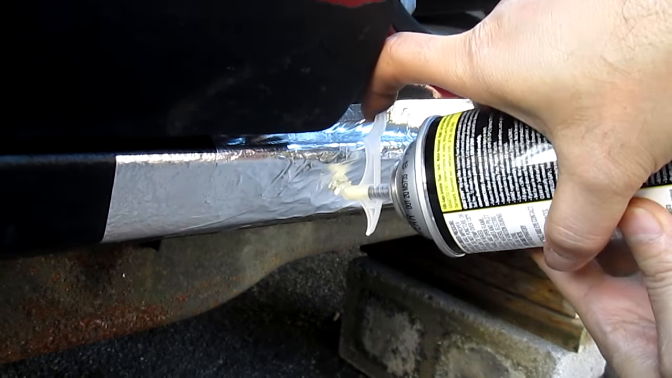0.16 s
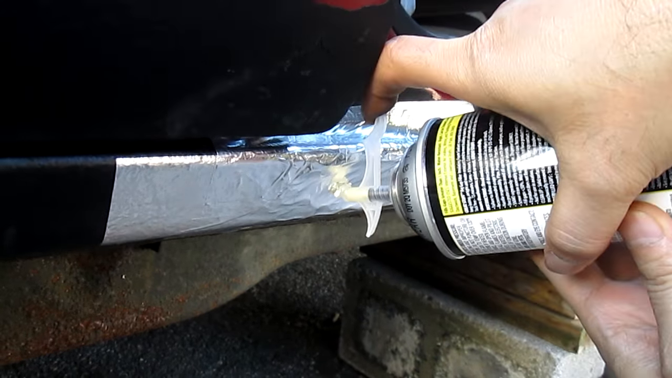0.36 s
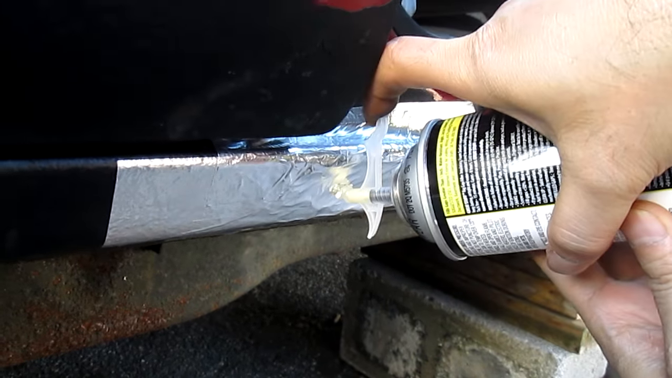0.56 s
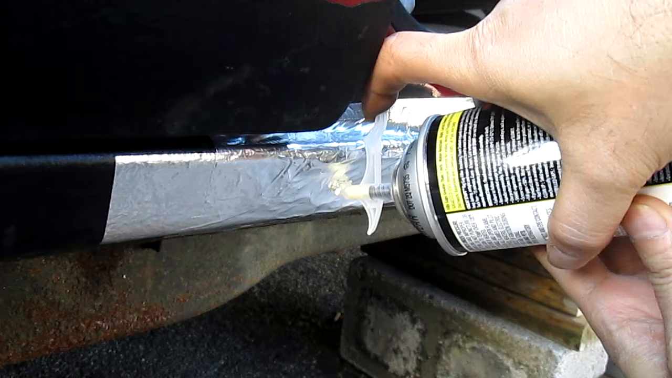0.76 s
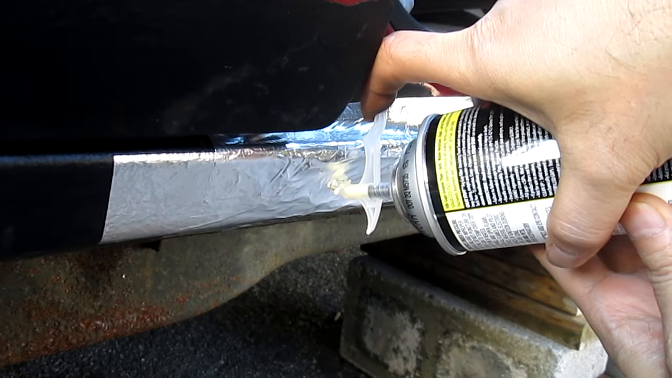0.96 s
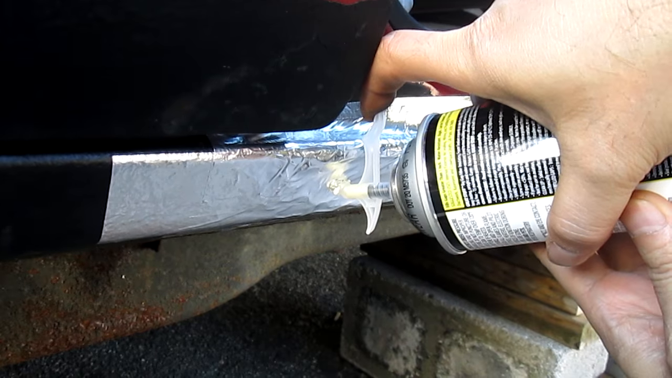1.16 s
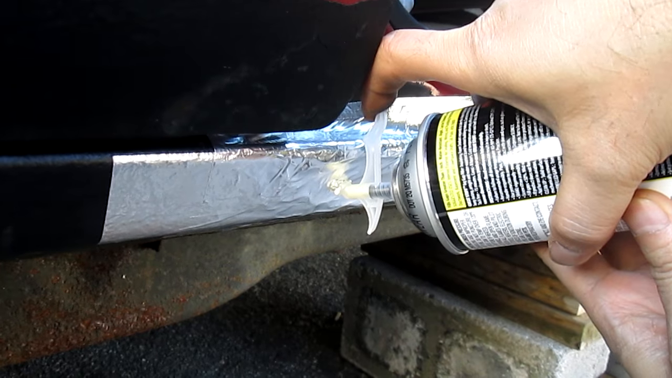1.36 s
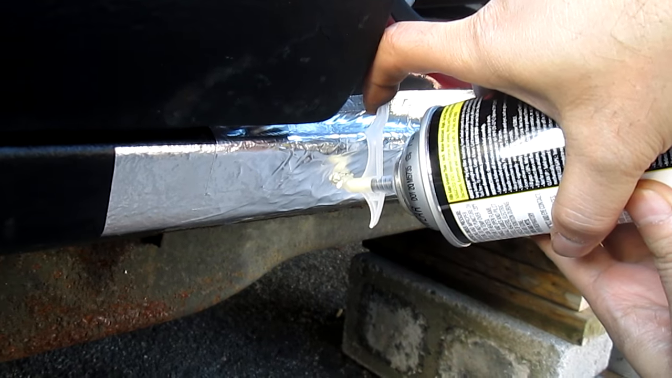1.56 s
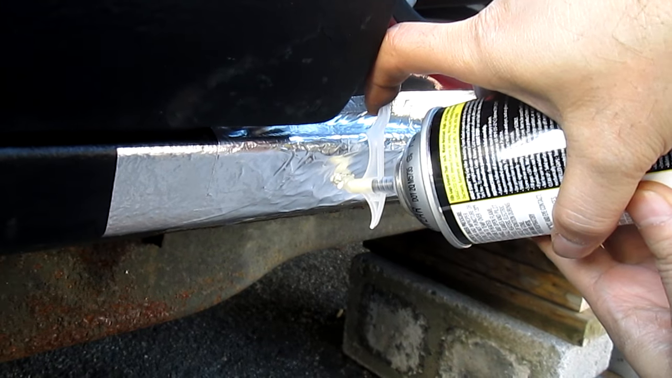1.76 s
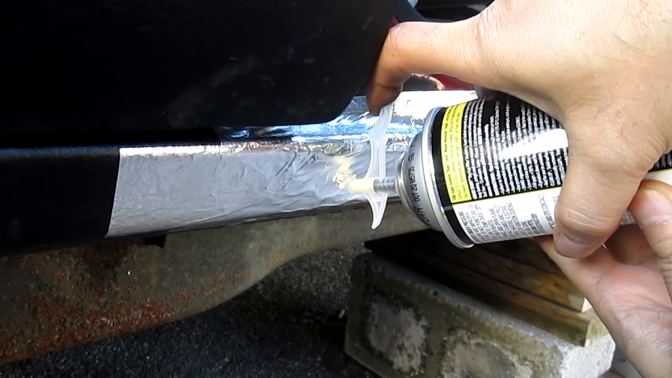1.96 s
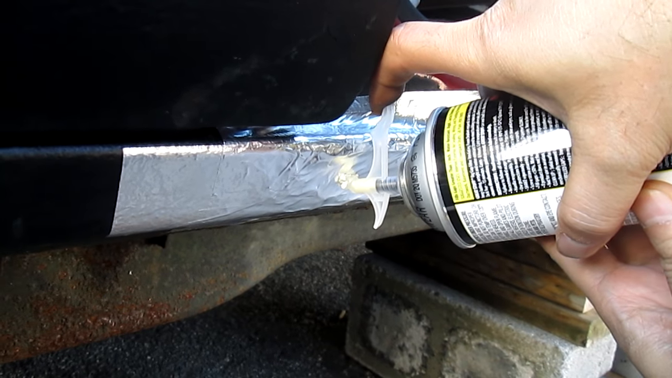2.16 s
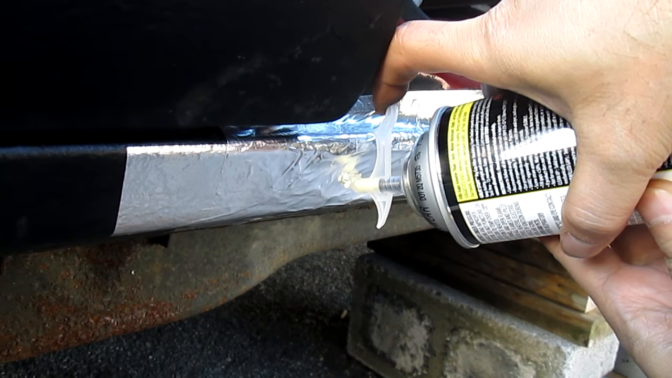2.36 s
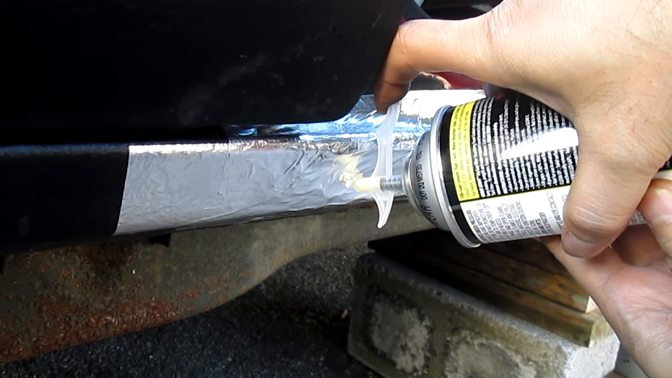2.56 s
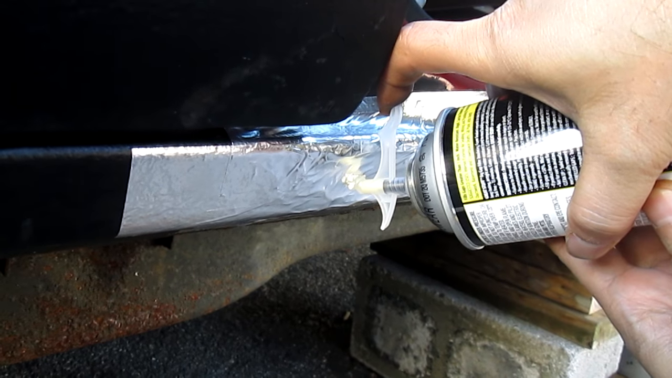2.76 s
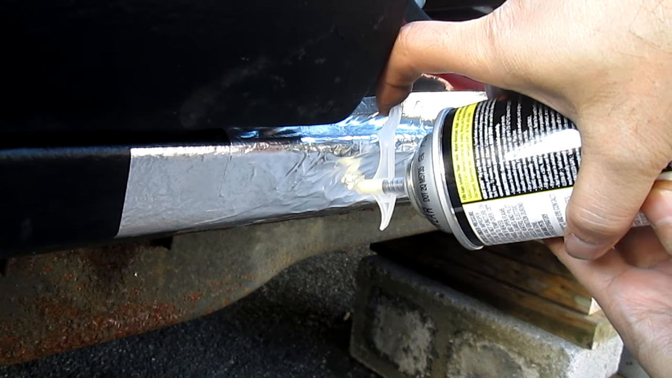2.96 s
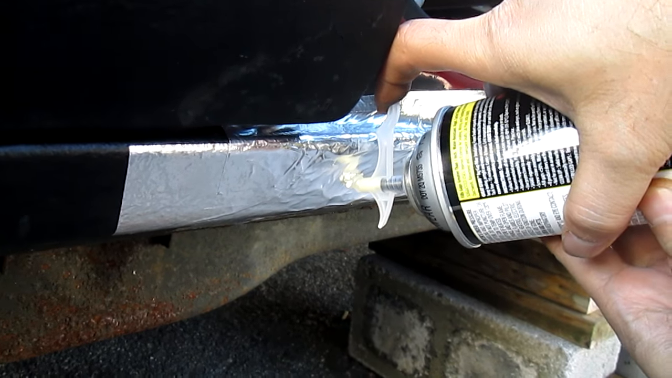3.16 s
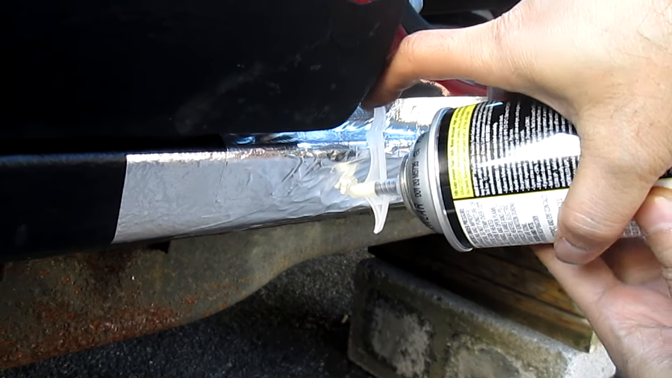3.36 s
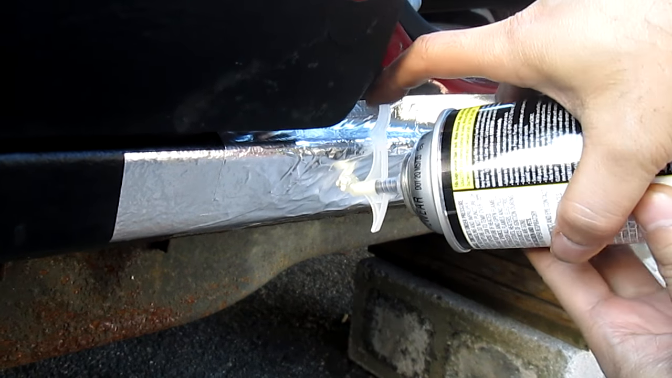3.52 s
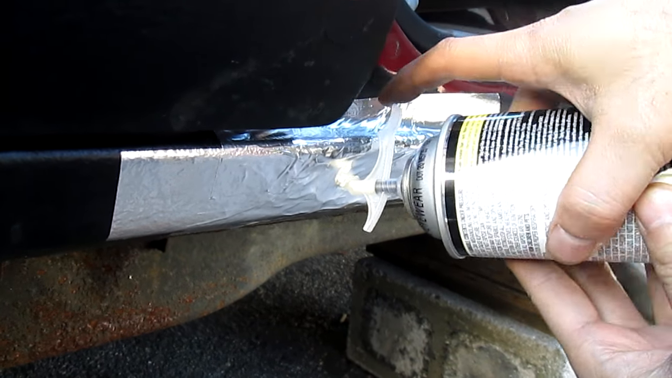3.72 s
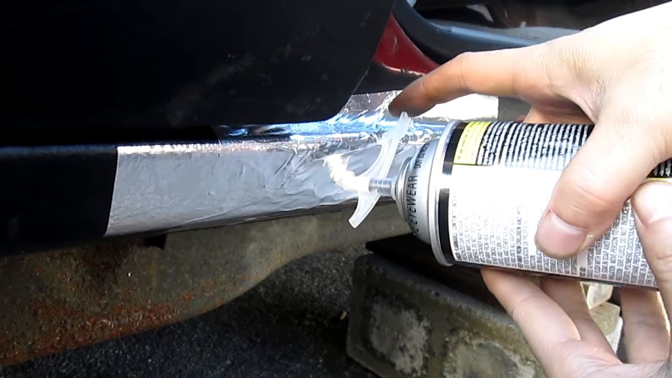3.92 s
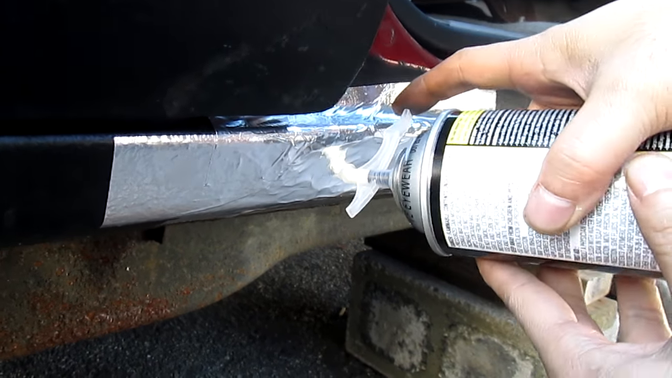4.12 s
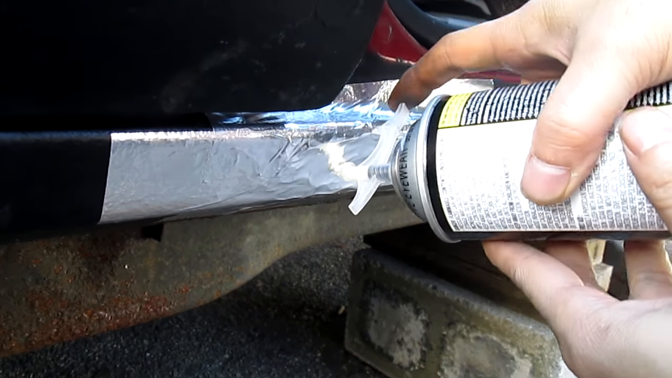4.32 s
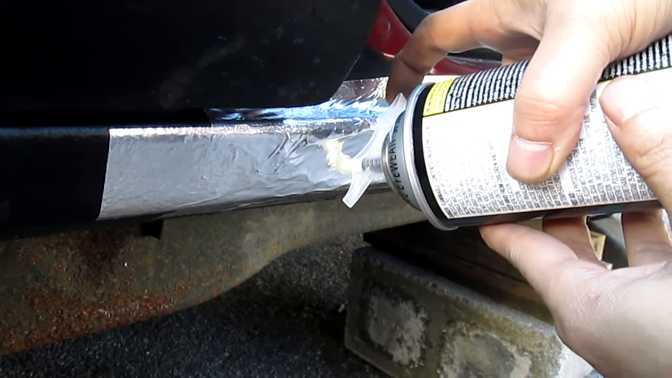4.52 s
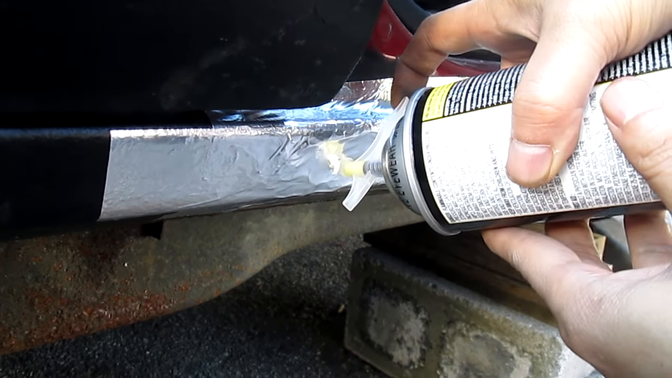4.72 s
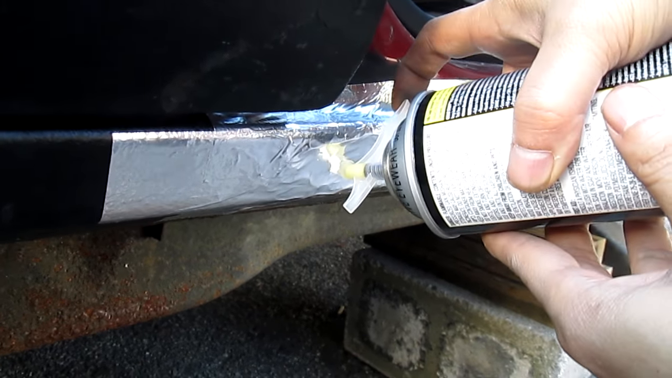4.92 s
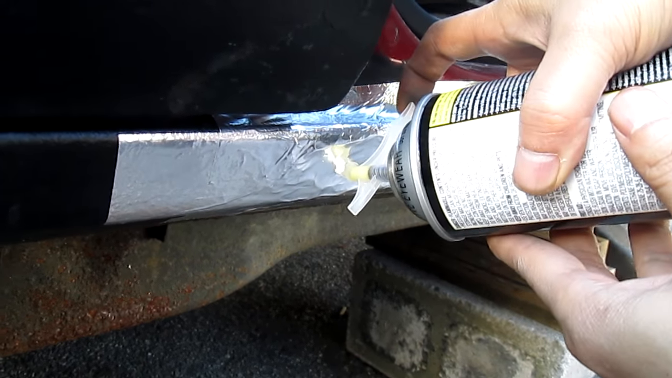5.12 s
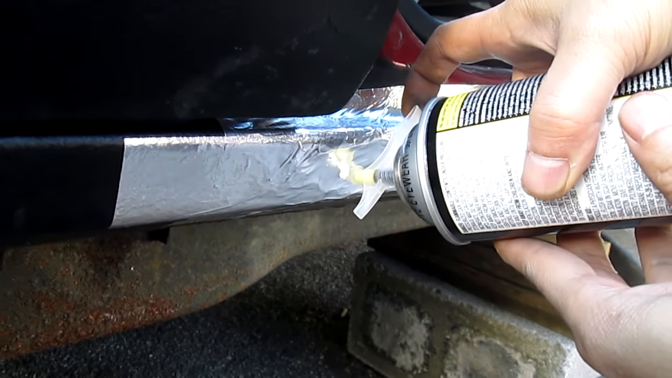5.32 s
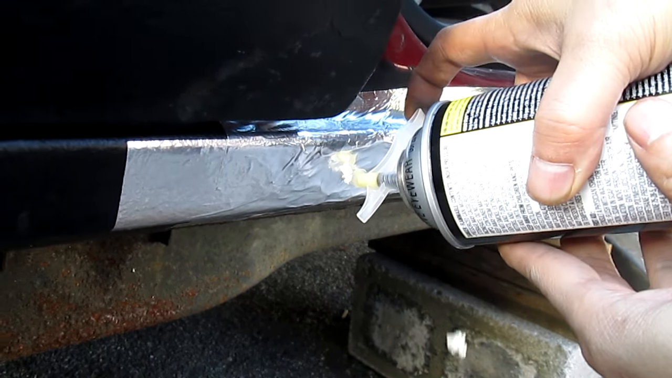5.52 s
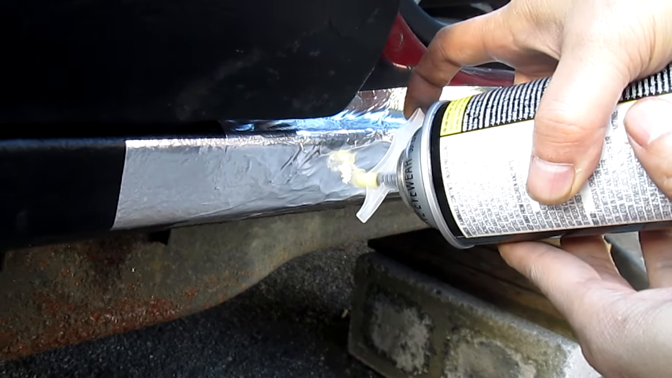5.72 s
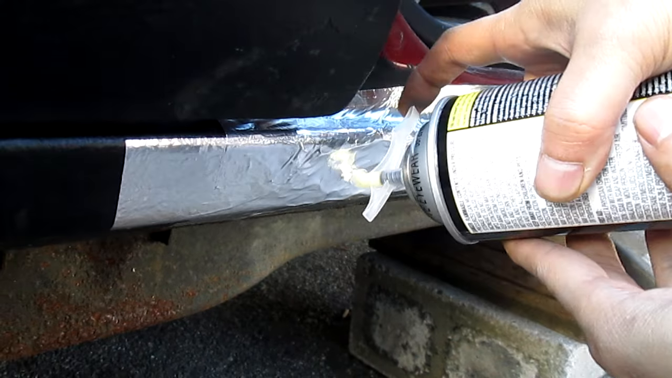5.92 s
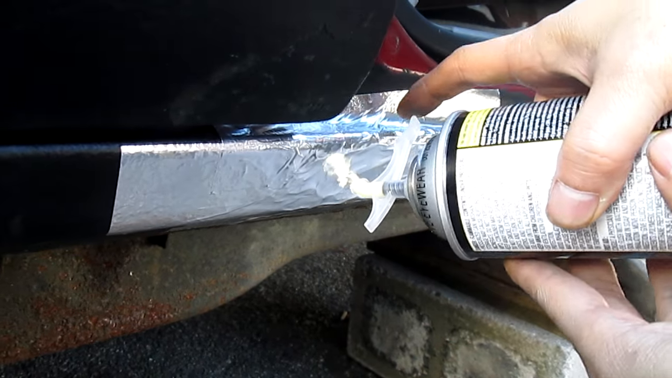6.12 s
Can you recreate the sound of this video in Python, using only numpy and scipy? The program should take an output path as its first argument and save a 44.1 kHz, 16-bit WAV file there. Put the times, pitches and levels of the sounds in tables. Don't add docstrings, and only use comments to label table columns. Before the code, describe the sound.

A spray foam can hisses in a long sputtering burst, stops with a plastic trigger click, then sprays a shorter, rougher burst over low outdoor wind rumble.

```python
import sys
import numpy as np
from scipy import signal
from scipy.fft import rfft, irfft, next_fast_len
from scipy.io import wavfile
from scipy.ndimage import uniform_filter1d

SR = 44100
rng = np.random.default_rng(int(sys.argv[2]) if len(sys.argv) > 2 else 0)


def store_wav(level_fs):
    pcm = np.round(np.clip(np.atleast_2d(level_fs), -1, 1) * 32767)
    wavfile.write(sys.argv[1], SR, pcm.T.astype(np.int16))


def invert_db(x):
    u = np.asarray(x, float) / 20
    return 10 ** u


N = 272538

# f/Hz, level/dB
BURST_COLOURS = [
    [(880, -35), (1500, -8), (1860, -15), (2260, -25), (2650, -16.5), (2860, -15), (3480, -16), (3880, -15),
     (4540, -12), (5740, -11.5), (7190, -0.5), (7700, -2), (9640, 0), (12600, -11), (15600, -26.5)],
    [(880, -25), (1500, -1), (1690, -2), (1930, -0.5), (2160, -17), (2650, -9.5), (3250, -10), (3520, -7.5),
     (4030, -15), (5790, 4.5), (9270, 9.5), (10500, -1.5), (11600, -2), (14400, -14), (15600, -23)],
]
# f/Hz, width/Hz, level/dB
PANEL_RIDGES = [
    [(1900, 130, -2.5), (2046, 50, -3.4), (2140, 60, 4.5), (2320, 100, -3.5), (3330, 60, -3),
     (3450, 130, 2), (2821, 80, -3.1), (5276, 130, -2.7), (6245, 130, 3.1), (6804, 80, 2.7),
     (6934, 130, -2.2), (7515, 80, -3.6), (7666, 80, 2.7), (9625, 80, -4.7), (9991, 200, 2.8),
     (10573, 80, -3.4), (10810, 200, -1.7), (12123, 130, 2.6), (14406, 80, 3.9)],
    [(2864, 50, -6.5), (3058, 130, 4.3), (3295, 50, -7.7), (3682, 50, -5.6), (4522, 80, -4.7),
     (4802, 50, -6.1), (5060, 50, -5.3), (5233, 130, 3.3), (5728, 130, 5.1), (6891, 50, -6.0),
     (7558, 50, -5.3), (9905, 130, 3.3), (13221, 80, -5.0), (14147, 130, 3.3)],
]


def evened(x):
    return x / np.sqrt(np.mean(x ** 2) + 1e-20)


def read(points, hz):
    f, value = np.transpose(points)
    return np.interp(np.log(hz + 1), np.log(f + 1), value)


def columns(rows):
    s, *rest = np.transpose(rows)
    return [np.interp(np.arange(N) / SR, s, column) for column in rest]


def colour(x, gain):
    size = next_fast_len(len(x) + 4096)
    hz = np.fft.rfftfreq(size, 1 / SR)
    return irfft(rfft(x, size) * gain(hz), size)[:len(x)]


def noise(gain, size=N):
    return colour(rng.standard_normal(size), gain)


def below(hz, corner_hz, order):
    return 1 / (1 + (hz / corner_hz) ** order)


def peak(hz, centre_hz, width):
    return 1 / (1 + 2j * (hz - centre_hz) / width)


def ridge_gain(hz, ridges):
    return invert_db(sum(db * 2 ** -(2 * (hz - f) / w) ** 2 for f, w, db in ridges))


def narrow(hz, width):
    turn = np.exp(2j * np.pi * np.cumsum(hz * np.ones(N)) / SR)
    r = np.exp(-np.pi * max(width, .5) / SR)
    start = rng.standard_normal(N + SR) + 1j * rng.standard_normal(N + SR)
    slow = signal.lfilter([1], [1, -r], start)[SR:]
    return evened((turn * slow).real)


def shadow(x, rows, width):
    hz, depth = columns(rows)
    turn = np.exp(2j * np.pi * np.cumsum(hz) / SR)
    r = np.exp(-np.pi * width / SR)
    band = 2 * (turn * signal.lfilter([1 - r], [1, -r], x / turn)).real
    return x - depth * band


def swells(rows):
    t = np.arange(N) / SR
    return sum(db * np.exp(-((t - s) / np.where(t < s, build, fall)) ** 2) for s, db, build, fall in rows)


def wind():
    # f/Hz, level/dB
    rumble_colour = [(12, -32), (20, -6), (97, 1.5), (125, -3), (161, -3), (245, -9.5), (269, -11),
                     (308, -14), (343, -22.5), (500, -23), (650, -51), (1100, -120)]
    # f/Hz, level/dB
    roar_colour = [(190, -40), (330, -4.5), (391, -10), (443, -6.5), (568, -6), (663, -6), (750, -6.5),
                   (1090, -10.5), (3940, -30.5), (6880, -35.5), (13400, -48.5)]
    # peak t/s, level/dB, build t/s, drop t/s
    gusts = [(.0, 4.5, .05, 0.039), (1.17, 0.5, .08, .05), (1.3, 1.5, .05, .08), (1.6, -2.5, .1, 0.084),
             (1.82, 0, .08, 0.079), (2.06, 1, .03, 0.052), (2.67, -2.5, .07, .1), (3.67, -1, 0.033, .03),
             (3.915, -8, 0.018, 0.032), (4.37, 2, .03, 0.12), (4.63, 4.5, 0.027, 0.036),
             (4.9, -2.5, .12, 0.24), (5.33, 4.5, .04, 0.061), (5.76, 1.5, .07, .1),
             (5.96, 5.5, 0.026, 0.077), (6.13, 4, 0.055, .05)]
    wind_db, trim_db, lump_db, roar_db = -25.5, -2, 0.5, -38.5
    lumps = evened(noise(lambda hz: below(hz, 12, 2)))
    rumble = evened(noise(lambda hz: invert_db(read(rumble_colour, hz))))
    roar = evened(noise(lambda hz: invert_db(read(roar_colour, hz))))
    rumble_db = wind_db + swells(gusts) + trim_db + lump_db * lumps
    return invert_db(rumble_db) * rumble + invert_db(roar_db) * roar


def drones():
    # start t/s, length t/s, f/Hz, glide/(Hz per s), level/dB
    engine_tones = [(0.043, 0.88, 39.4, 1.6, -26.5), (0.803, 0.62, 39.6, 0, -26.5),
                    (1.193, 0.96, 39.5, 2.5, -31), (2.0, 0.85, 39.7, 1.8, -27), (2.99, 0.45, 40, 6, -31),
                    (3.401, 1.06, 39.8, 1.1, -29.5), (4.794, 0.52, 53, 2, -30),
                    (5.293, 0.535, 50.4, 2, -35), (0.305, 0.51, 70.5, -1, -33),
                    (0.894, 0.73, 72.3, 6.5, -26), (1.548, 0.25, 74.5, 2.5, -28),
                    (1.791, 0.37, 75, -3, -23), (2.2, 0.58, 74, 1.5, -27), (2.72, .25, 75.1, .5, -28),
                    (3.048, 0.38, 74, 0.5, -28), (3.998, 0.67, 87.7, 14, -31),
                    (4.596, .15, 100.3, 22, -22.5), (5.095, 0.14, 76.5, 4, -28),
                    (5.309, 0.48, 83.6, 5, -34.5), (5.918, 0.094, 89.5, 4, -27.5),
                    (3.066, 0.35, 156, 3, -34), (3.36, 1.15, 150.7, 9, -30), (4.22, .7, 162, -9, -31),
                    (3.648, 0.38, 182.5, 0.5, -34), (4.149, 0.37, 105, 4, -32), (0, 0.53, 161, 0, -34.5),
                    (1.893, 0.98, 165.5, -6, -35.5), (1.89, .8, 180.6, 2, -38), (1.01, 0.63, 182, 5, -36.5),
                    (1.6, 0.76, 103, 3.5, -32), (2.5, 0.96, 105, -1, -38.5), (3.578, .2, 82, 4, -32),
                    (5.638, 0.51, 126, 5.5, -30)]
    waver, fade = 0.13, 0.64
    out = np.zeros(N + SR)
    fuzz = narrow(0, width=7)
    for s, length, hz, glide, db in engine_tones:
        t = np.arange(round(length * SR)) / SR
        edge = 1 + waver * np.roll(fuzz, round(s * SR * 3))[:len(t)]
        tone = np.sqrt(2) * np.sin(2 * np.pi * (hz * (s + t) + glide * t ** 2 / 2))
        out[round(s * SR):][:len(t)] += invert_db(db) * edge * tone * signal.windows.tukey(len(t), fade)
    return out[:N]


def ticks():
    # t/s, peak level/dB, ring f/Hz, fall by 60 dB t/s, snap level/dB
    trigger_ticks = [(3.8355, -44, 9500, .015, -45), (3.9047, -21.5, 2600, 0.011, -33),
                     (3.9057, -27, 1698, .012, -60), (3.9060, -20, 2200, .012, -42),
                     (3.9075, -23, 2500, 0.016, -60), (3.9100, -22, 1500, .02, -60),
                     (3.9125, -27, 2300, .02, -60), (3.9150, -32, 1300, .02, -60),
                     (3.9212, -37, 2000, .015, -60), (3.9250, -38, 2500, .02, -60),
                     (4.022, -37, 2600, .02, -55), (6.0672, -33, 900, 0.010, -60)]
    # t/s, level/dB, pressed t/s, rebound level/dB, rebound t/s
    camera_push = (3.9045, -18, .009, -12, .0045)
    size = 4000
    out, t = np.zeros(N + size), np.arange(size) / SR
    for s, db, hz, t60, snap_db in trigger_ticks:
        rattle = evened(noise(lambda f: abs(peak(f, hz, 0.76 * hz)) ** 3, size))
        tone = np.sin(2 * np.pi * hz * t)
        attack = np.minimum(t / 0.00037, 1)
        ring = (0.4 * tone + 0.73 * rattle) * invert_db(db - 60 * t / t60) * attack
        snap = noise(lambda f: below(f, 12500, 20), size) * invert_db(snap_db - 60 * t / 0.0051)
        out[round(s * SR):][:size] += ring + snap
    s, db, hold, back_db, back = camera_push
    press = -invert_db(db) * signal.windows.tukey(round(hold * SR), .3)
    rebound = invert_db(back_db) * np.hanning(round(back * SR))
    jolt = np.r_[press, rebound]
    out[round(s * SR):][:len(jolt)] += jolt
    return out[:N]


def air_bands():
    # start t/s, length t/s, f/Hz, width/Hz, level/dB
    passing_bands = [(4.468, 0.11, 4300, 700, -30), (.03, 0.56, 414, 110, -36), (3.1, 0.28, 535, 160, -35.5),
                     (5.5, .13, 2940, 1000, -29), (5.22, .24, 3400, 900, -31), (4.54, .1, 3200, 1400, -31),
                     (4.76, .05, 6500, 2500, -27), (5.3, 0.597, 710, 900, -31),
                     (4.47, 0.085, 900, 1200, -38.5), (4.462, 0.1, 2620, 640, -33.5),
                     (4.55, 0.081, 6700, 3700, -23.5), (4.676, .016, 2900, 2500, -22),
                     (4.72, 0.047, 3570, 470, -27), (4.63, 0.15, 1260, 960, -23),
                     (4.56, .24, 3840, 1700, -30.5), (5.584, 0.024, 2400, 820, -25.5),
                     (5.801, 0.049, 1400, 300, -28), (4.464, 0.15, 7400, 1400, -33.5),
                     (4.66, 0.084, 750, 550, -27), (4.78, 0.17, 9500, 1500, -24.5)]
    out = np.zeros(N)
    for s, length, hz, width, db in passing_bands:
        size = round(length * SR)
        air = noise(lambda f: abs(peak(f, hz, width)) ** 2, SR)[:size]
        out[round(s * SR):][:size] += invert_db(db) * evened(air) * signal.windows.tukey(size, 0.63)
    return colour(out, lambda hz: ridge_gain(hz, PANEL_RIDGES[1]))


def sputter(slugs):
    rate, spread = columns(slugs)
    rhythm = narrow(rate, spread.mean())
    flutter = evened(noise(lambda hz: below(hz, 460, 4) * hz / (hz + 70)))
    quick = colour(rhythm + flutter, lambda hz: hz ** 2 / (hz ** 2 + 45 ** 2))
    return evened(np.tanh(1.3 * evened(quick)))


def levels(press, hand, laws):
    # peak t/s, level/dB, build t/s, drop t/s
    surges = [(0.025, 3, .05, 0.026), (0.707, 1, 0.14, .06), (1.14, 1.5, 0.11, 0.046),
              (1.52, 2.5, 0.3, 0.011), (2.06, 2, .25, 0.023), (2.46, 2.5, 0.18, 0.069),
              (3.34, 3, 0.025, 0.026), (2.84, 0, .08, .08), (5.2, 4, 0.034, 0.027), (5.4, 0, 0.11, 0.027),
              (4.71, 4, 0.025, 0.048), (4.96, 1.5, 0.063, .03), (4.757, -3, .005, .008),
              (4.65, -3, .015, .025)]
    # wakes in t/s, share of the easing, lingers t/s, dies in t/s
    valve = [
        (0.044, 1.16, 0.003, 0.061),
        (0.027, 0.56, 0.003, 0.14),
        (0.0058, 0.089, 0.021, 0.034),
        (0.019, 0.47, .012, 0.038),
        (0.058, 1, 0.0017, .033),
        (0.075, 2.1, 0.001, 0.037),
    ]
    pivot_db = -20
    fizz_db, fizz_db_per_s = -39, 50
    opens, eases, ease_db, shuts, _ = press
    pressure_db, turn_db, foam_db = columns(hand)
    pressure_db = pressure_db + swells(surges)
    t = np.arange(N) / SR
    eased_db = ease_db * np.clip((t - eases) / 0.024, 0, 1)
    out = []
    for (db, push, turn, foam), (wake, ease, linger, die) in zip(laws, valve):
        held_db = db + push * (pressure_db - pivot_db) + turn * turn_db + foam * foam_db
        since = np.maximum(t - shuts - linger, 0)
        opening_db = 45 * np.exp(-np.maximum(t - opens, 0) / wake)
        dying_db = fizz_db_per_s * since - fizz_db * (1 - np.exp(-since / die))
        out.append(held_db + ease * eased_db - opening_db - dying_db)
    return out


def burst(press, hand, laws, slugs, spectrum, sill, echoes, ridges):
    splits_hz = [2050, 4700, 6500, 10650]
    shares = (.5, .45, .7, .95, 1.03, 1.0)
    layers_db = levels(press, hand, laws)
    jet_db = layers_db[-2]
    live = np.clip((np.arange(N) / SR - press[0]) / .01, 0, 1)
    depth_db = press[-1] * np.clip((jet_db + 36) / 12, 0, 1)
    swing_db = depth_db * sputter(slugs)
    gas = rng.standard_normal(N)

    comb_hz = np.fft.rfftfreq(8192, 1 / SR)
    comb = abs(1 + sum(g * np.exp(-2j * np.pi * comb_hz * ms / 1000) for ms, g in echoes))
    comb = comb * ridge_gain(comb_hz, ridges)

    def boom(hz):
        return sum(invert_db(db) * abs(peak(hz, f, w)) ** 2 for f, w, db in sill)

    def low(hz):
        return below(hz, 1130, 12)

    def jet(hz):
        return invert_db(read(spectrum, hz))

    def under(hz, i):
        return below(hz, splits_hz[i], 24)

    shapes = [lambda hz: boom(hz) * low(hz),
              lambda hz: boom(hz) * (1 - low(hz)),
              lambda hz: jet(hz) * (under(hz, 1) - under(hz, 0)),
              lambda hz: jet(hz) * (under(hz, 2) - under(hz, 1)),
              lambda hz: jet(hz) * (under(hz, 3) - under(hz, 2)),
              lambda hz: jet(hz) * (1 - under(hz, 3))]
    out = np.zeros(N)
    for level_db, shape, share in zip(layers_db, shapes, shares):
        def heard(hz):
            return shape(hz) * np.interp(hz, comb_hz, comb)
        puff_db = share * swing_db
        mean_db = (share * depth_db) ** 2 * np.log(10) / 20
        unit = np.sqrt(np.mean(colour(gas, heard) ** 2))
        puffs = gas * invert_db(puff_db - mean_db + level_db) * live
        out += colour(puffs, heard) / unit
    return out


def spits(jet):
    # t/s, peak level/dB
    clots = [(0.0942, -7), (0.1685, -4), (0.5247, -4), (0.613, -5), (0.6958, -3), (0.7647, -4),
             (0.8135, -1), (0.9991, -3), (1.0854, -5), (1.1398, -2), (1.1712, -3), (1.2191, -4),
             (1.3394, -2), (1.5354, -1), (1.5998, -5), (1.7474, -5), (1.8297, -5), (1.924, -2),
             (1.9704, -2), (2.1934, -5), (2.2717, -3), (2.9926, -5), (3.0794, -7), (3.2685, -8),
             (3.3298, -7), (4.6813, -2), (4.8963, -2)]
    size_db, length_s, hold = -9.5, .002, 0.44
    out, t = jet.copy(), np.arange(400) / SR
    for s, db in clots:
        at = round(s * SR)
        out[at - 300:at] *= 1 - hold * np.hanning(600)[100:400]
        crack = noise(lambda hz: invert_db(read(BURST_COLOURS[0], hz)), 400)
        out[at:at + 400] += invert_db(db + size_db) * evened(crack) * np.exp(-t / length_s)
    return out


def foam_can():
    # opens t/s, eases t/s, eases by level/dB, shuts t/s, sputter depth/dB
    presses = [
        (-.2, 3.28, -2, 3.36, 4),
        (4.462, 5.877, -6, 5.936, 4),
    ]
    # t/s, gas pressure/dB, nozzle turned to microphone/dB, foam in flow/dB
    hands = [
        [(0, -22, -4, -2), (.25, -20.5, 3, -0.5), (1.0, -19, -1, 0), (1.5, -18, -3.5, -0.5),
         (1.8, -17.5, -3.5, 0.5), (2.2, -18.5, -5, 1), (2.6, -20, -5.5, 3.5), (2.85, -18.5, -3.5, 2.5),
         (3.3, -22, -2.5, 2)],
        [(4.5, -22, -2, -4.5), (4.66, -21.5, 3.5, -4.5), (4.78, -19.5, 5.5, -3), (4.9, -20, -0.5, -4.5),
         (5.0, -20.5, 4, -3.5), (5.07, -22, -0.5, -3), (5.38, -22.5, 1, 2), (5.5, -24.5, 8.5, 0.5),
         (5.88, -23.5, 9, 2.5)],
    ]
    # level/dB, dB per pressure dB, dB per turn dB, dB per foam dB
    hand_laws = [
        [(-30, 0.22, 0, 0.34), (-33, -0.46, 0, .5), (-32.5, 0.3, 0, -1.07), (-28.5, 0.9, 0.16, -0.23),
         (-21, 1.07, 0, 0.18), (-26, 1.5, 1, 0)],
        [(-24.5, 0.12, 0, 1.46), (-27.5, 0.5, 0, 0.85), (-28.5, 1.1, 0.15, 1.02), (-26.5, 1.84, 0.05, 0.6),
         (-21, 1.16, 0, -0.13), (-25.5, 1, 1, 0)],
    ]
    # t/s, rate/(slugs per s), spread/Hz
    slug_rates = [
        [(0, 105, 30), (1.5, 108, 25), (3.4, 122, 30)],
        [(4.45, 160, 91), (5.0, 175, 100), (6.0, 195, 90)],
    ]
    # f/Hz, width/Hz, level/dB
    sill_modes = [
        [(271, 150, -16), (394, 83, 3.5), (528, 79, -1.5), (751, 91, 2.5), (960, 400, -6), (1258, 92, -8.5),
         (1446, 140, -7.5), (1590, 84, -7), (1880, 270, -18)],
        [(256, 52, -2.5), (342, 31, -0.5), (398, 80, 1.5), (497, 110, -0.5), (615, 100, -8), (803, 240, 2),
         (1063, 125, -1), (1227, 87, -8), (1422, 190, -2), (1800, 510, -12)],
    ]
    # delay/ms, gain/1
    near_echoes = [
        [(0.82, 0.073), (0.875, 0.13), (1.025, -0.048), (1.12, 0.067), (1.235, 0.044), (1.35, 0.033),
         (1.4, 0.021), (1.99, 0.095), (2.225, 0.064), (2.495, -0.14), (2.67, -0.063), (2.72, -0.086),
         (2.85, -0.047), (3.065, -0.11)],
        [(1.1, 0.1), (1.14, 0.049), (1.29, -0.083), (1.375, 0.088), (1.505, 0.057), (1.565, -0.012),
         (1.61, 0.096), (1.995, 0.057), (2.22, 0.078), (2.26, -0.098), (2.445, -0.091), (2.825, -0.166),
         (3.565, -0.06), (4.145, -0.11)],
    ]
    # t/s, f/Hz, depth/(0 to 1)
    middle_hollow = [(0, 1110, .5), (.3, 1050, 0.5), (.7, 1100, 0.04), (3.4, 1100, .1), (5.75, 1100, 0.06),
                     (5.9, 1100, 0.3), (6.18, 1100, .4)]
    # t/s, f/Hz, depth/(0 to 1)
    hand_hollow = [(0, 10900, 0), (1.5, 10630, .2), (2.0, 11300, 0.9), (3.4, 10600, .6), (4.55, 11000, .6),
                   (4.66, 11000, .85), (4.77, 10950, 0.8), (4.79, 10450, 0.9), (4.88, 10800, .9),
                   (4.97, 10800, 0.85), (5.06, 10800, 0.95), (5.15, 10700, .9), (5.27, 10500, .8),
                   (5.4, 10400, 0.7), (5.55, 10400, .3), (5.65, 10100, .7), (6.18, 10200, 0.5)]
    # t/s, f/Hz, depth/(0 to 1)
    low_hollow = [(0, 5700, 0.34), (1.6, 5750, 0), (2.2, 5770, 0.4), (3.4, 5880, 0.5), (4.4, 5000, 0.4),
                  (6.18, 4900, .3)]
    parts = zip(presses, hands, hand_laws, slug_rates, BURST_COLOURS, sill_modes, near_echoes, PANEL_RIDGES)
    can = sum(burst(*part) for part in parts)
    can = spits(shadow(can, middle_hollow, width=330))
    can = shadow(can, hand_hollow, width=380)
    return shadow(can, low_hollow, width=320)


def scene():
    return (wind() + drones() + ticks() + air_bands() + foam_can())[None]


def ceiling(x):
    treble_limits = [(-120, 13500), (-64, 14300), (-47, 15100), (-29.6, 15800)]
    hz, _, z = signal.stft(x, SR, nperseg=2048, noverlap=1536)
    treble = uniform_filter1d((abs(z[hz > 12000]) ** 2).sum(0) * 4 / 3, size=7)
    level_db, top_hz = np.transpose(treble_limits)
    row = np.searchsorted(level_db, 10 * np.log10(treble + 1e-11)) - 1
    kept = z * (hz[:, None] < top_hz[row])
    return signal.istft(kept, SR, nperseg=2048, noverlap=1536)[1][:N]


def low_pass(x):
    return signal.sosfilt(signal.butter(12, 15730, fs=SR, output="sos"), x)


def record(dry):
    # f/Hz, width/Hz, depth/(0 to 1)
    whine_notches = [
        (3940, 110, .88),
        (7852, 120, .9),
    ]

    def notch_gain(hz):
        return np.prod([1 - d * peak(hz, f, w) for f, w, d in whine_notches], axis=0)

    notched = colour(dry[0], notch_gain)
    mix = np.clip(ceiling(notched), -1, 1)[None]
    return low_pass(mix)


dry = scene()
out = record(dry)
store_wav(out)
```